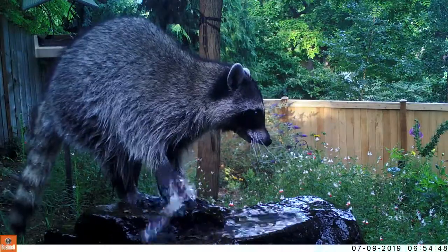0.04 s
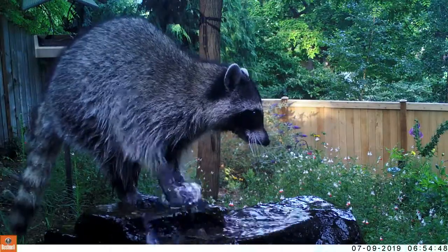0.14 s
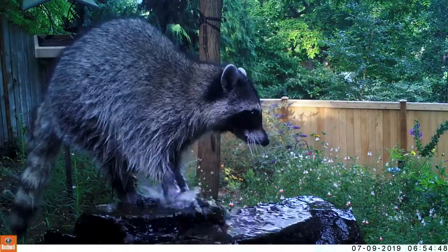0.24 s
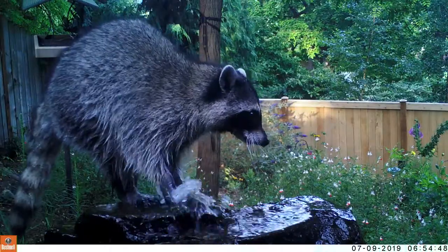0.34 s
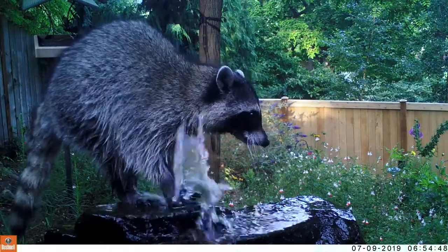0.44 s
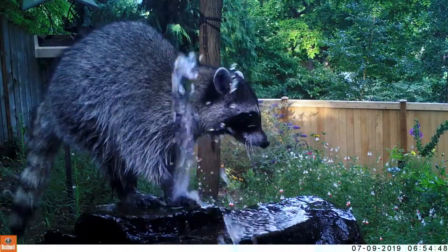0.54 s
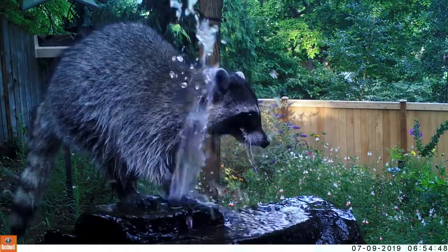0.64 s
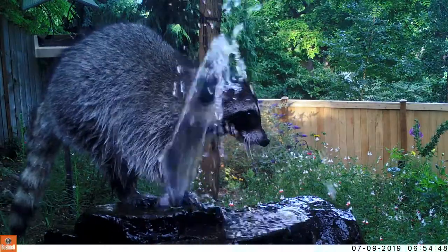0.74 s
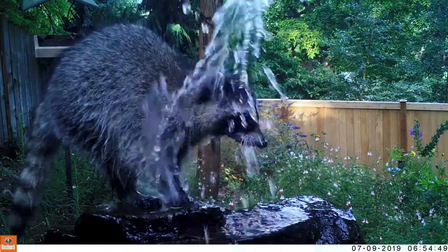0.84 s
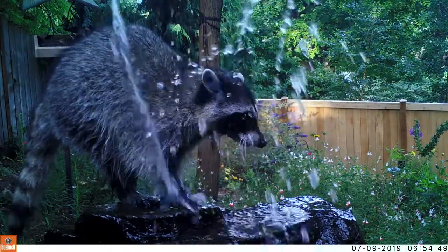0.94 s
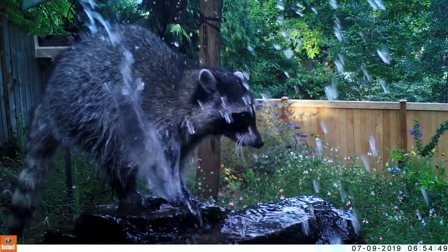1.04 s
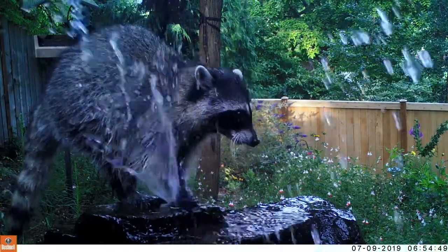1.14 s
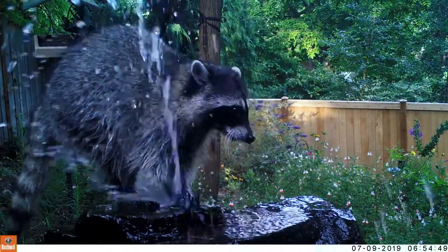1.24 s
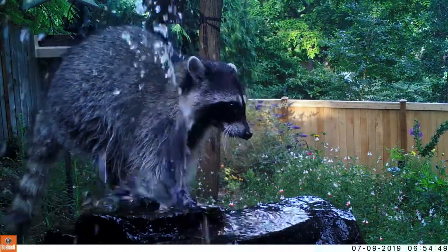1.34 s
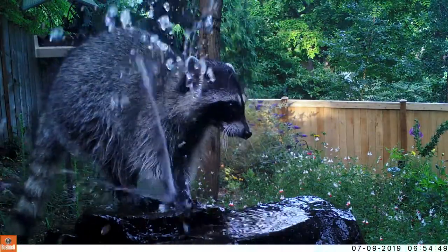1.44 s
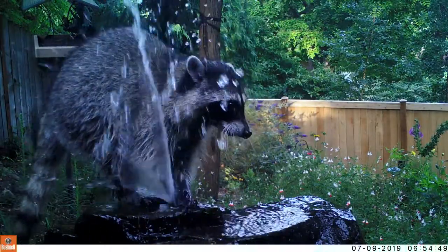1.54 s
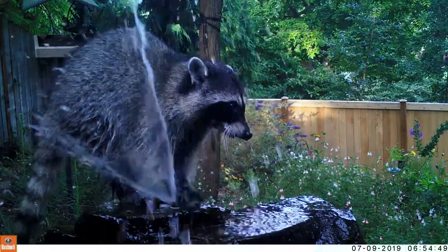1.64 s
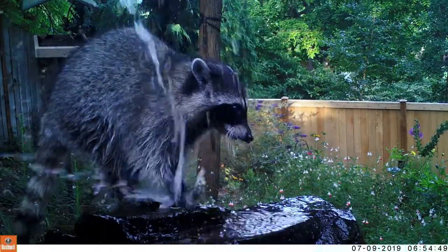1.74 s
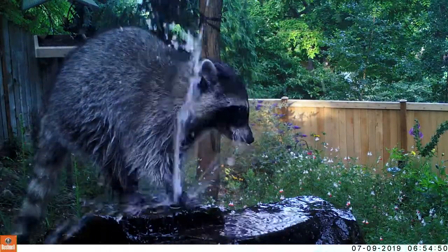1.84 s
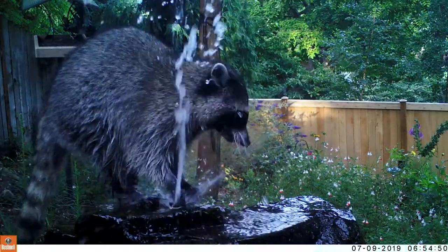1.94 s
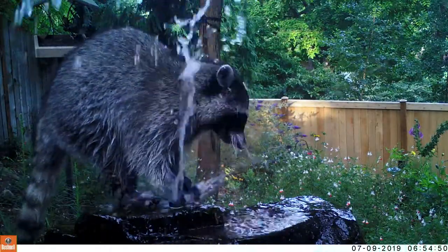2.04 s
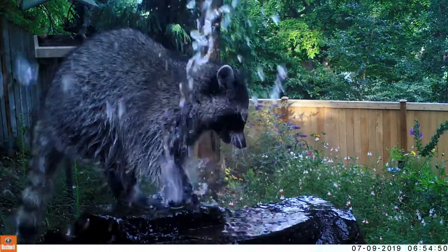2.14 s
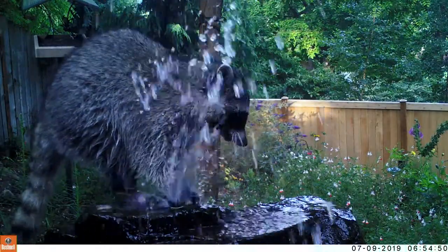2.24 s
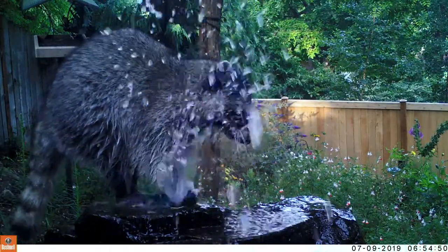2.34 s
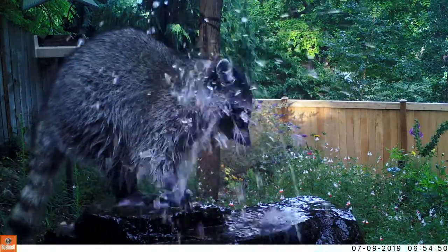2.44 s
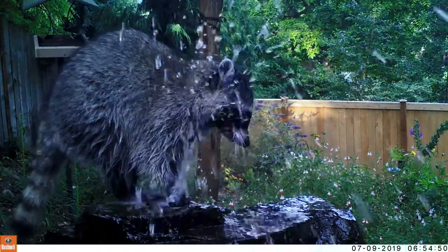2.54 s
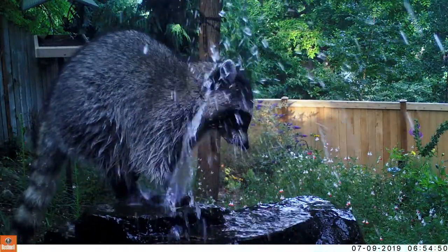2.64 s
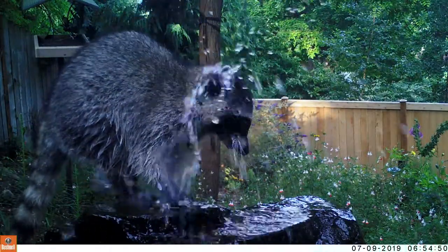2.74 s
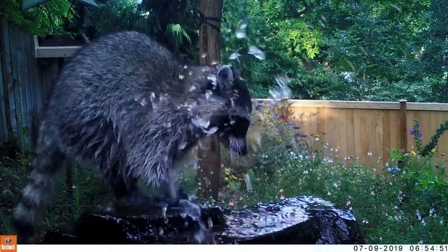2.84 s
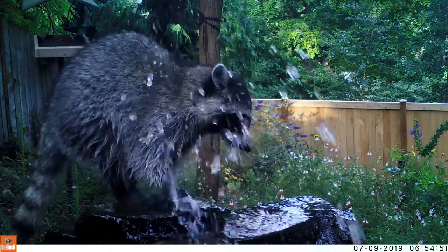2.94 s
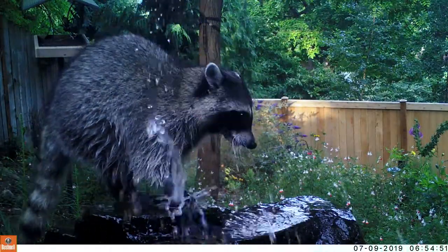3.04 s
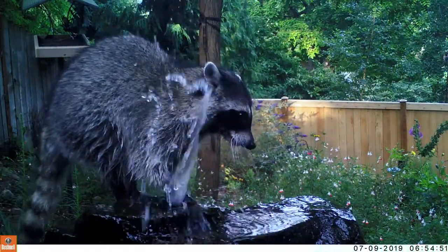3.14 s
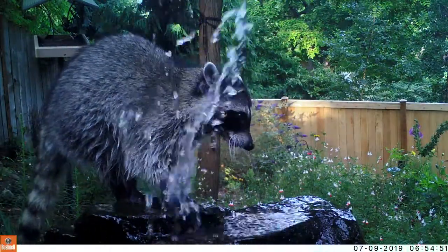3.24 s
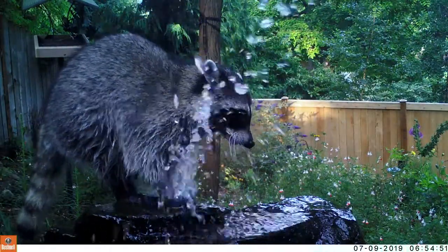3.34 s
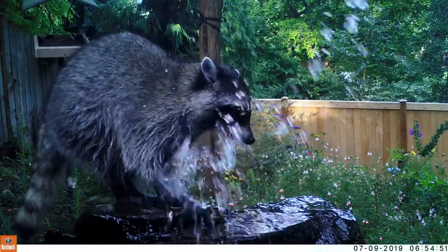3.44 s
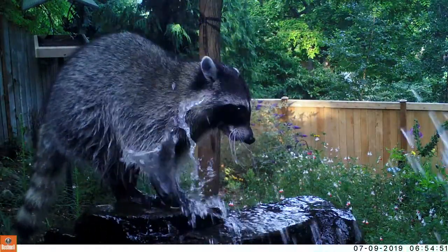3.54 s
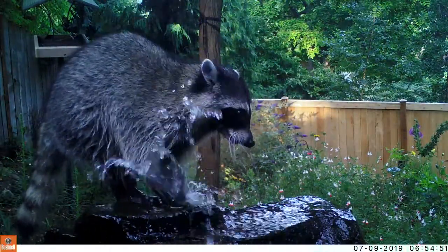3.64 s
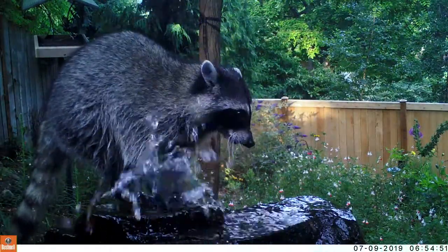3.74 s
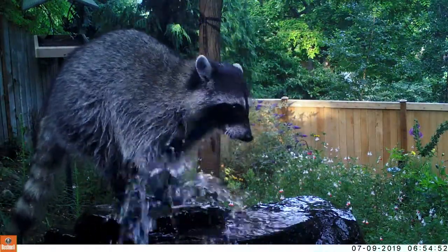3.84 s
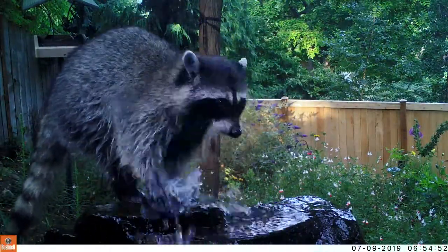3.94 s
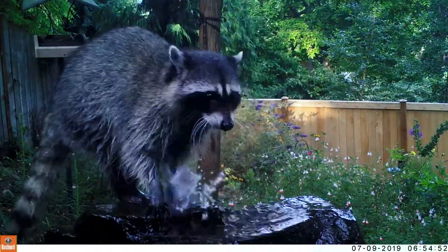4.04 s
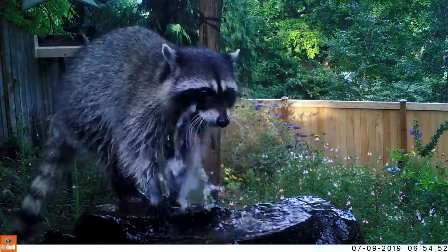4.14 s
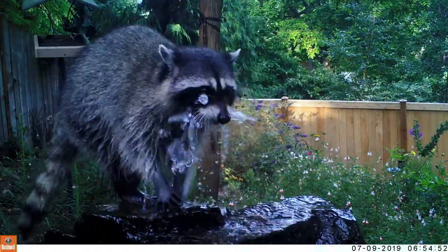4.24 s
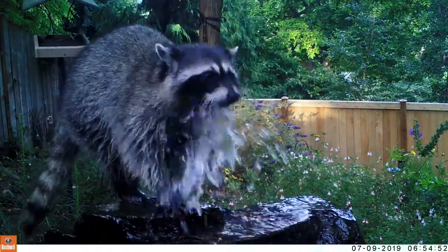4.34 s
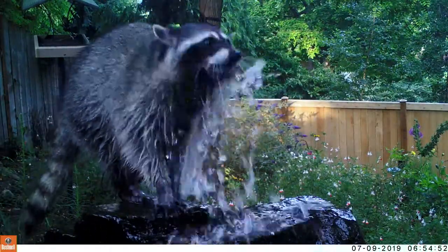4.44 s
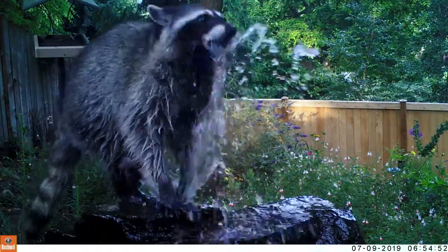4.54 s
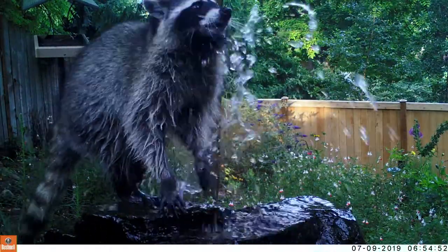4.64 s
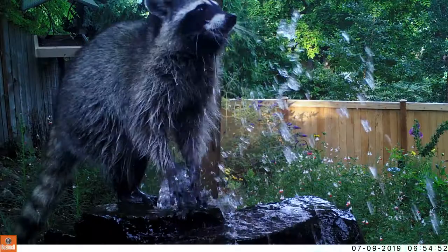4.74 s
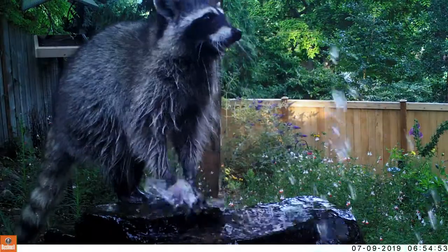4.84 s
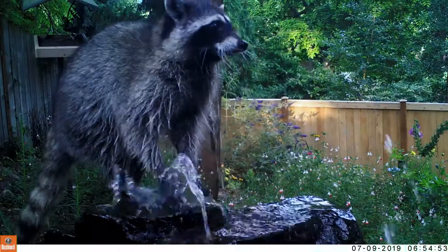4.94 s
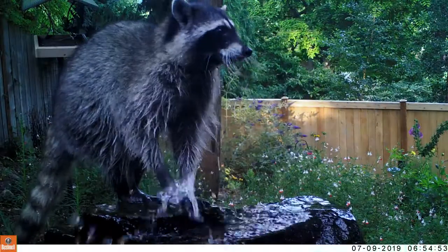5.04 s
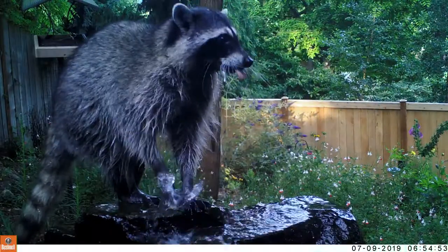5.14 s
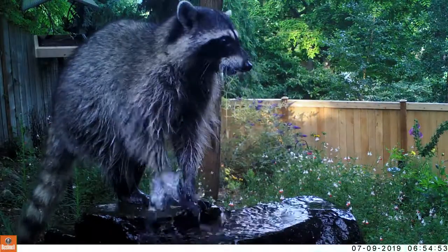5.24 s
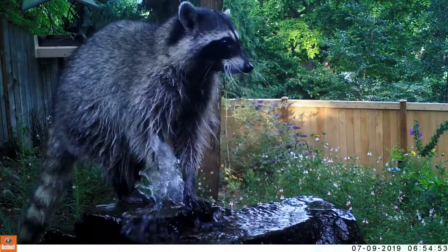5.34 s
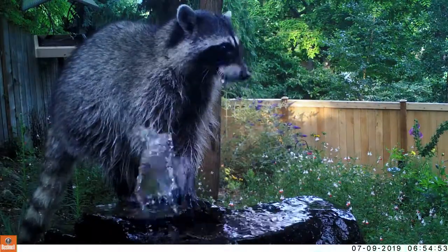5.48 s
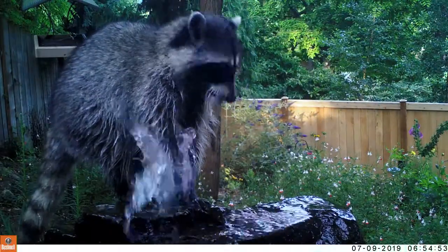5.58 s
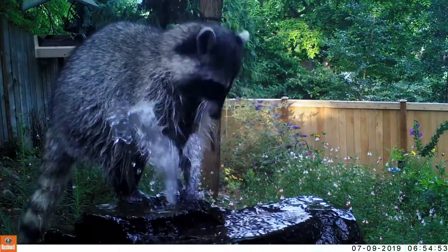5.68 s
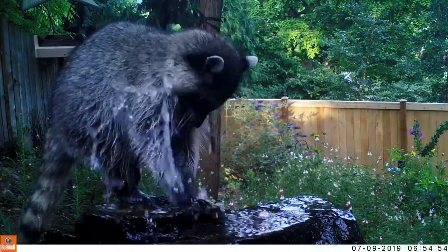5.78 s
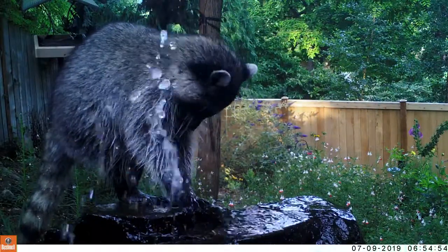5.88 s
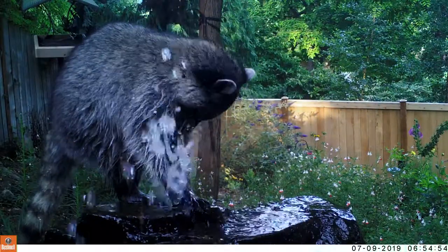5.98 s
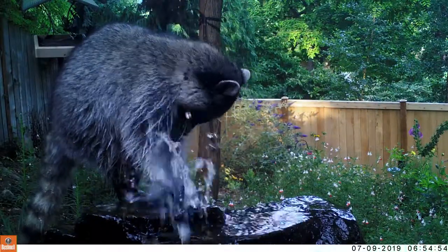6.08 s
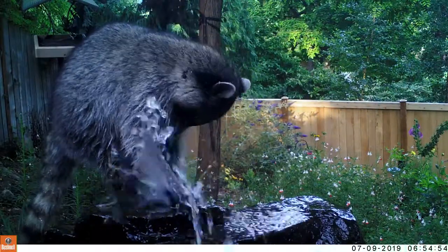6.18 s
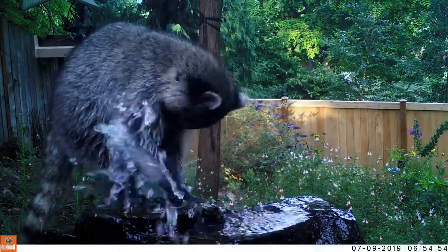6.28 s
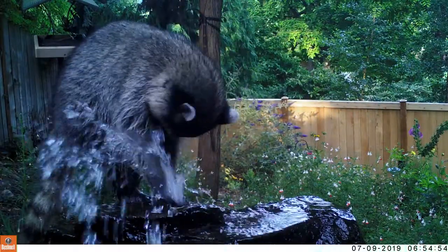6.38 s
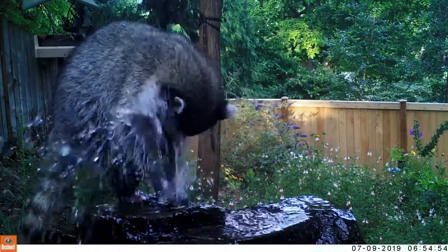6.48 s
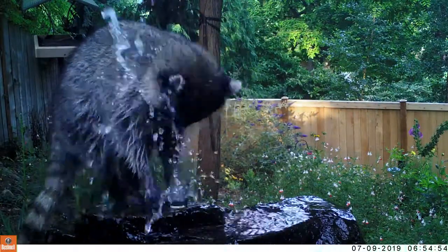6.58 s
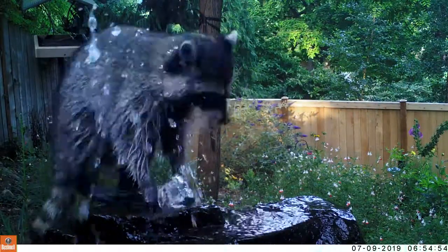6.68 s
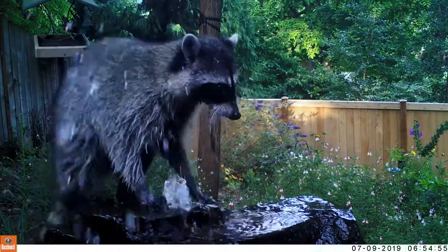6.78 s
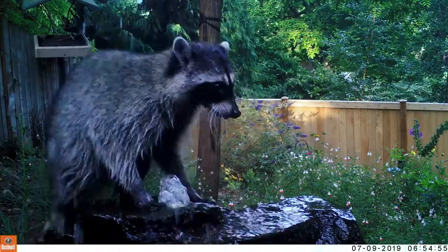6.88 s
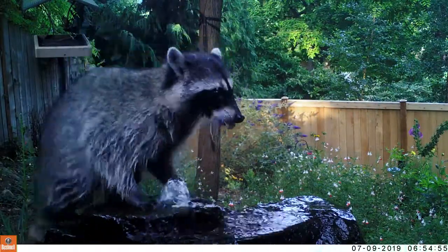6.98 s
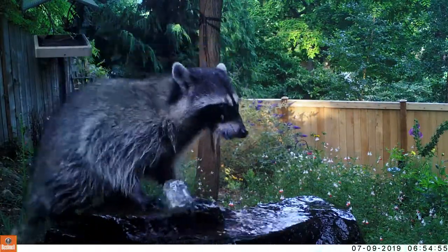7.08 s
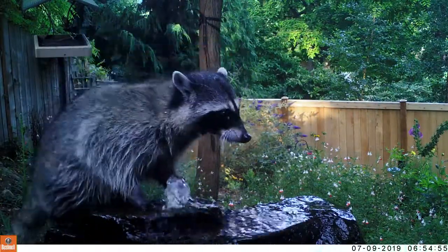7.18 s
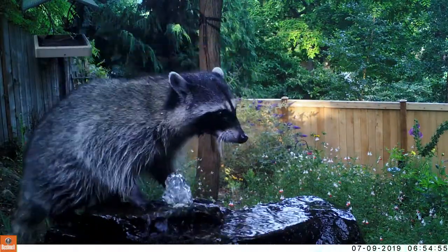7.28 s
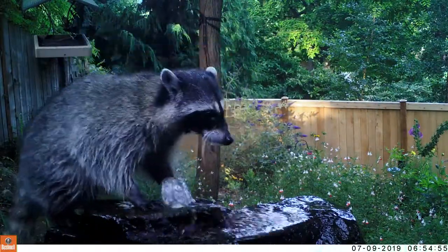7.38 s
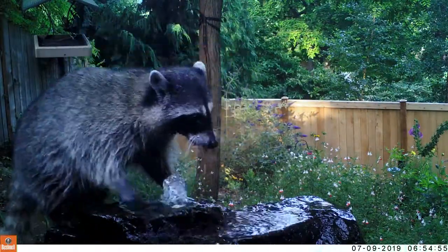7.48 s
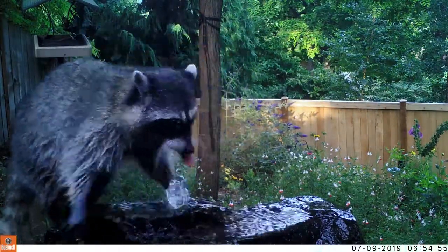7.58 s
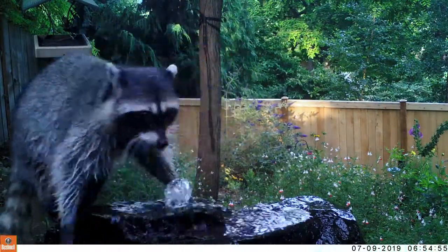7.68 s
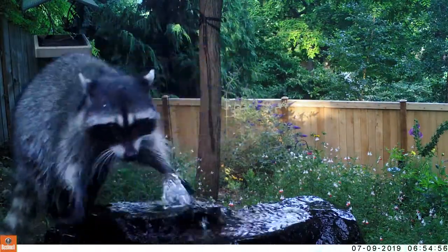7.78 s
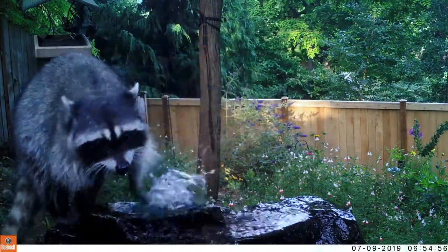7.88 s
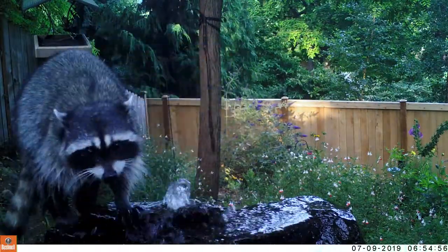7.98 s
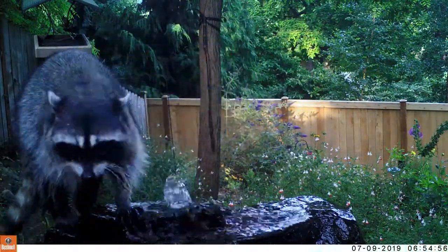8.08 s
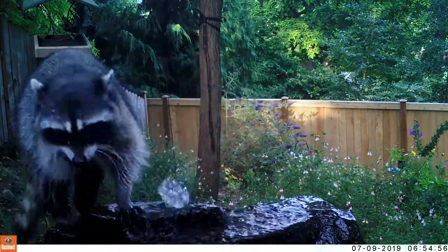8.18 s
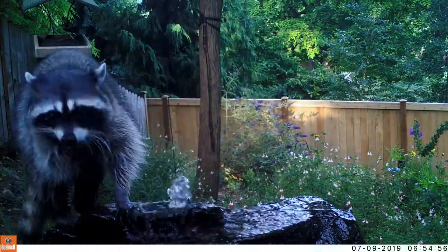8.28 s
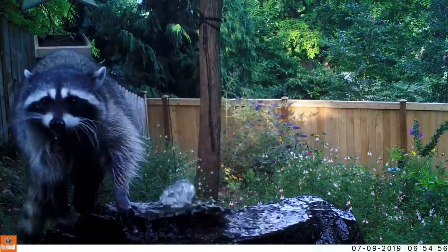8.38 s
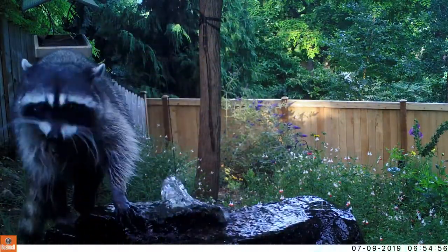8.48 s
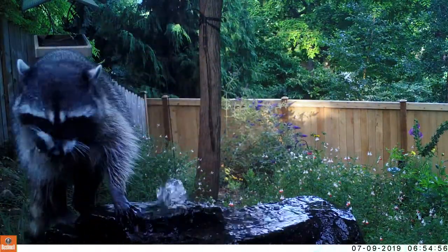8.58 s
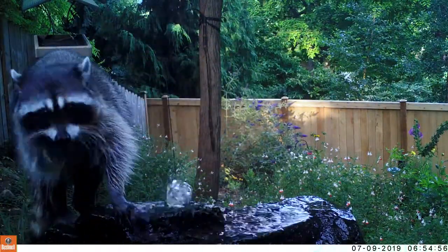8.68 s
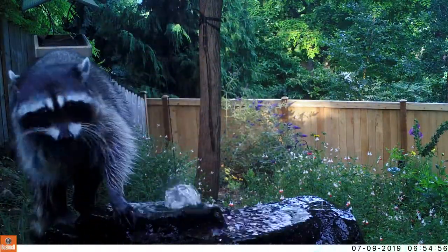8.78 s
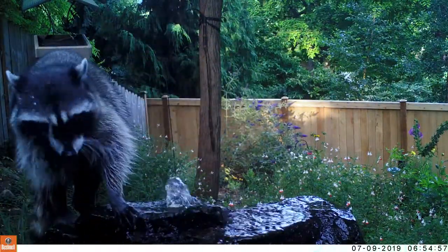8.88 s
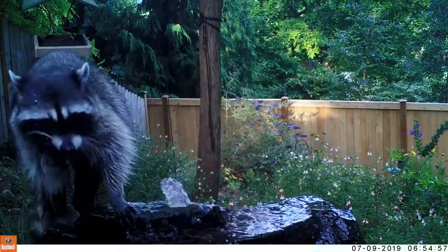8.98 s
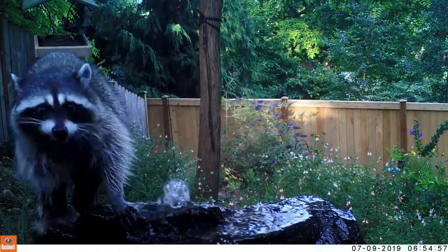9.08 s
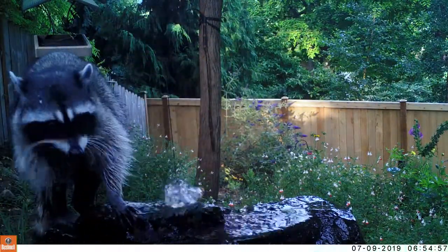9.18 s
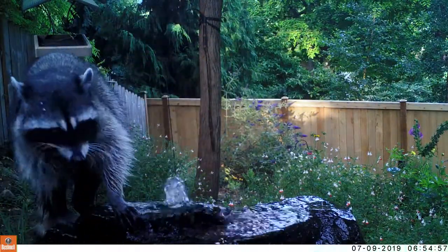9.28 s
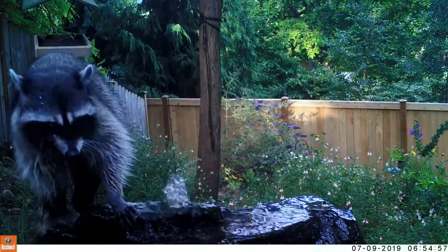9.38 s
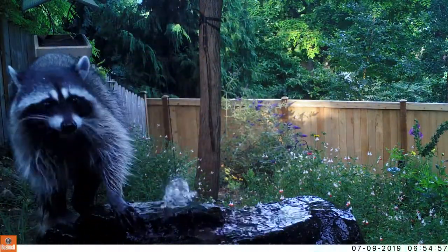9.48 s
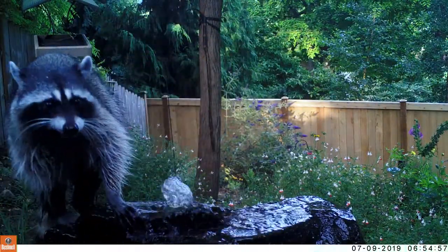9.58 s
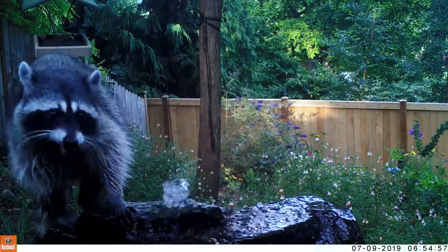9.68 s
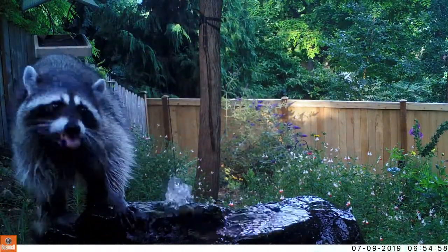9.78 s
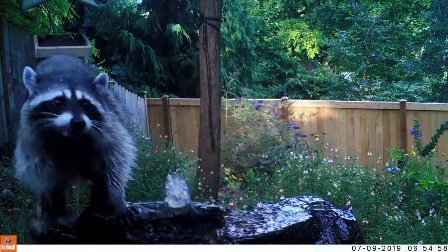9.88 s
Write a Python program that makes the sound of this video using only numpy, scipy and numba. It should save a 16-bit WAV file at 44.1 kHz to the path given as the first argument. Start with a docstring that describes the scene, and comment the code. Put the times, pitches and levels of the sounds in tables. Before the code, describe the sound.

A small rock fountain burbles close by throughout, over a faint low rumble of distant traffic. From the start a raccoon paws at the jet, and thrown water patters brightly on stone and leaves, with wet splats, small rising bubble pops and occasional soft plops. From about 1 second the spray thickens into a busy shower, and a paw gives a few light, hollow slaps on wet rock up to 2.5 seconds and once more near 5. Around 3 seconds fine drops begin ticking on the stone. Splashes then come in uneven surges, near 3.3, 3.9, 4.5, 5 and 5.8 seconds, with brief lulls between them. A strong splash lands at about 6.4 seconds, followed by more spatter around 7. After that the spray thins to scattered drops and a few small splats, while the jet keeps burbling quietly until the end, near 10 seconds.

```python
"""A raccoon paws at the jet of a garden rock fountain. From the start the jet burbles over far traffic,
thrown water patters on stone and leaves, air pockets pop with a rising chirp and big bubbles ring softly.
Gobs land as splats; from about one second the spray thickens and a paw now and then slaps the wet rock.
Near three seconds fine drops begin to tick on stone. Showers come and go, and after seven seconds
the spray thins to scattered drops while the jet burbles on."""
import sys
import numpy as np
from scipy import signal
from scipy.fft import rfft, irfft
from scipy.io import wavfile
from scipy.ndimage import uniform_filter1d
from numba import njit

SR = 44100
rng = np.random.default_rng(int(sys.argv[2]) if len(sys.argv) > 2 else 0)


def bounce(signal):
    """Save signal as a 16-bit WAV file at the path given by the first command-line argument."""
    frames = np.transpose(np.atleast_2d(signal))
    limited = np.clip(frames, -1, 1)
    pcm = np.round(limited * 32767).astype(np.int16)
    wavfile.write(sys.argv[1], SR, pcm)


N = 437472

# spectrum of the background noise: (frequency [Hz], relative level [dB])
YARD_SPECTRUM = [(9, -29.5), (15, 0.5), (33, 1.5), (87, -5), (250, -17), (490, -24.5), (730, -27),
                 (2100, -36.5), (6000, -43.5), (10000, -51.5), (14500, -48.5)]
# steady fall of thrown water: (time [s], level [dB], treble lift from fine spray [dB])
STEADY_FALL = [(0, -63, -2), (0.19, -69, 0), (0.3, -60.5, -2), (1.0, -54.5, 4.5), (1.4, -49.5, 4),
               (1.8, -49, 6.5), (2.3, -50.5, 5.5), (3.1, -52, 3.5), (3.2, -57, 2.5), (3.7, -60, 10),
               (4.25, -64.5, 4), (4.9, -62.5, 2), (5.6, -62, 3), (6.0, -51.5, -2), (6.35, -56.5, 5),
               (6.8, -54, 7), (7.3, -63, 7.5), (7.7, -70, -6), (8.2, -62.5, 5), (8.4, -67.5, -4),
               (9.92, -68.5, 4)]
# sheets of water flung by a paw: (peak time [s], level [dB], decay time [s])
FLUNG_SHEETS = [(0.27, -58, .06), (1.27, -54, 0.027), (1.38, -52.5, 0.19), (1.83, -41.5, 0.022),
                (2.41, -45.5, 0.51), (3.27, -45.5, 0.094), (3.5, -51, 0.037), (3.8, -47.5, 0.036),
                (3.89, -44.5, 0.052), (4.05, -51.5, 0.12), (4.32, -53.5, 0.16), (4.541, -49.5, 0.15),
                (4.62, -52, 0.063), (4.98, -46, 0.091), (5.06, -54, 0.046), (5.165, -48, 0.025),
                (5.275, -47, 0.043), (5.42, -57, 0.088), (5.809, -43, 0.029), (6.09, -51, 0.044),
                (6.393, -38, 0.052), (6.9, -49, 0.041), (7.15, -55, 0.047), (8.25, -58, 0.03),
                (9.39, -63.5, .06)]
# the microphone's colouring of the water, ringing near 3.3 and 5.9 kHz: (frequency [Hz], gain [dB])
MIC_COLOUR = [(410, -25), (700, -25.5), (1130, -12.5), (1580, -14), (1880, -13.5), (3290, -3), (4030, -3),
              (5890, 2.5), (9070, -13.5), (12300, -30), (14000, -32), (14500, -60)]
# air pockets closing: (time [s], peak level [dB], pitch at the peak [Hz], climb [octaves])
AIR_POCKETS = [(0.048, -46, 2500, 0.63), (0.314, -56, 760, 0.41), (0.571, -43.5, 1480, 0.4),
               (0.636, -39, 2030, 1.03), (1.137, -40.5, 2400, 1.3), (1.2558, -29.5, 2610, 2.6),
               (1.3747, -38, 1496, 0.2), (1.9322, -28, 3160, 1.24), (2.1877, -40, 3430, 1.5),
               (2.3918, -24, 3270, 0.71), (2.942, -44.5, 2350, 1.9), (3.2724, -30.5, 3370, 1.4),
               (4.6088, -35, 3000, 0.61), (5.132, -43, 3500, 1), (5.2664, -47, 3120, 1.3),
               (5.895, -43, 1470, 1), (6.005, -37, 2840, 0.37), (6.168, -39, 2790, 1.5),
               (6.3816, -32, 3220, 2.2), (6.575, -36, 3700, 1.4), (6.813, -38, 2300, 0.72),
               (6.9068, -33.5, 2900, 1.05), (6.9517, -36.5, 2640, 1.14), (7.524, -47, 3930, .3),
               (8.409, -49, 2960, 0.5), (8.928, -46.5, 4280, 0.74), (9.648, -52.5, 2600, .3)]
# big bubbles in the basin: (time [s], peak level [dB])
BASIN_BUBBLES = [(0.222, -60), (0.92, -62), (1.645, -57), (2.158, -57), (2.64, -63), (4.85, -62),
                 (6.585, -60), (7.955, -61)]
# gobs landing: (time [s], nominal level [dB], pitch [Hz], droplets relative to that level [dB])
GOBS = [(0.27, -26.5, 5730, -18.5), (0.334, -32, 5600, -11), (0.743, -35, 6050, -10.5),
        (0.782, -29.5, 6100, -10), (0.8131, -32, 5450, -12), (0.94, -30, 5130, -30),
        (1.0165, -27.5, 4700, -16), (1.076, -27.5, 5500, -11), (1.1446, -27.5, 6800, -15),
        (1.218, -20.5, 5400, -13.5), (1.27, -24, 5810, -9.5), (1.441, -27, 5600, -18),
        (1.3657, -28, 5060, -10), (1.4054, -18, 6100, -30), (1.46, -24.5, 4670, -8),
        (1.6127, -28.5, 5230, -31), (1.8445, -28, 5360, -8), (1.8903, -18, 5300, -27),
        (1.933, -24, 4730, -14.5), (2.0018, -25.5, 5800, -4), (2.1281, -17, 6300, -36),
        (2.1885, -31.5, 3580, -14.5), (2.363, -27, 5050, -13.5), (2.3934, -24.5, 3070, -14.5),
        (2.465, -31, 5280, 0), (2.567, -25, 6030, -9.5), (2.7385, -23, 5970, -23),
        (2.783, -23.5, 4730, -30), (2.8427, -19.5, 6600, -28), (2.9238, -20, 7060, -23.5),
        (3.127, -27, 6940, -17.5), (3.244, -19, 5240, -20), (3.272, -17.5, 3600, -30),
        (3.3278, -26.5, 5800, -13), (3.3889, -29, 6800, -21), (3.475, -24.5, 6350, -26),
        (3.5214, -26.5, 6040, -15), (3.6714, -28.5, 7350, -33), (3.6934, -26, 7260, -22),
        (3.787, -23, 6160, -14.5), (3.8692, -22, 5490, -13), (3.9147, -21.5, 6700, -19),
        (3.9955, -27.5, 5550, -16.5), (4.077, -27.5, 5740, -24), (4.134, -29.5, 3900, -18.5),
        (4.3179, -22, 6060, -29), (4.6091, -31.5, 5450, -6.5), (4.678, -31, 5500, -10.5),
        (4.735, -29, 5600, -24), (4.783, -30.5, 6740, -16), (4.999, -32.5, 4440, -13),
        (5.017, -27, 5000, -12.5), (5.0496, -16.5, 5200, -21.5), (5.134, -29.5, 4480, -10.5),
        (5.281, -36, 5850, -7), (5.379, -34, 6240, -19), (5.417, -27, 6200, -18.5), (5.642, -28, 6000, -21),
        (6.2547, -27.5, 5130, -17.5), (6.375, -21, 5700, -26), (6.3828, -25, 6270, -20),
        (6.427, -30, 6000, -10), (6.471, -19, 6360, -15.5), (6.6473, -30, 6370, -9),
        (6.7275, -28, 3800, -25), (6.769, -24.5, 6580, -17), (6.7976, -26, 6600, -15.5),
        (6.905, -40, 5530, -7), (6.9972, -21.5, 5440, -20.5), (7.094, -41.5, 7400, -12.5),
        (7.1559, -28, 5780, -5.5), (7.222, -26.5, 8500, -30), (7.255, -43, 6500, -5),
        (7.9935, -40.5, 5960, -8.5), (8.0407, -35, 5930, -12), (8.237, -43, 3140, -9),
        (9.1355, -35.5, 4770, -25), (9.351, -38, 3650, -24), (9.3784, -41.5, 5840, -4),
        (9.874, -33, 5060, -26)]
# paws striking wet rock: (time [s], peak level [dB])
PAW_BLOWS = [(1.254, -44), (1.459, -35), (1.999, -36), (2.464, -40), (5.132, -46)]
# fine drops bursting on stone: (time [s], nominal level [dB])
FINE_DROPS = [(2.9103, -41), (2.9288, -30), (2.9941, -42), (3.0288, -33.5), (3.0955, -29.5), (3.142, -33.5),
              (3.3378, -39), (3.374, -39), (3.396, -35), (3.4282, -36), (3.494, -39), (3.6857, -33),
              (3.9504, -37), (4.0644, -39), (5.3348, -46.5), (5.9569, -48), (6.0888, -34), (6.2766, -46),
              (6.6804, -50), (6.7112, -29.5), (6.7502, -31.5), (7.1112, -41), (7.1284, -36), (8.317, -51),
              (8.3623, -43.5), (8.4855, -52), (9.0344, -50), (9.4015, -50), (9.5173, -51)]


def undb(db):
    return 10 ** (np.asarray(db) / 20)


def level(x, db):
    return x * undb(db) / np.sqrt(np.mean(x ** 2))


def outline(points, hz):
    """Interpolation of a spectrum in dB over log frequency."""
    corner_hz, db = np.transpose(points)
    return np.interp(np.log(hz), np.log(corner_hz), db)


def colour(x, points):
    """Minimum-phase filtering: folding the cepstrum makes the given spectrum a causal response."""
    cepstrum = irfft(np.log(undb(outline(points, np.arange(1, 4098) * SR / 8192))))
    cepstrum[1:4096] *= 2
    cepstrum[4097:] = 0
    return signal.fftconvolve(x, irfft(np.exp(rfft(cepstrum))))[:N]


def wander(rate_hz):
    """Random modulation: held values, smoothed twice, of unit deviation."""
    hold = int(SR / rate_hz)
    steps = np.repeat(rng.standard_normal(N // hold + 1), hold)
    smooth = uniform_filter1d(uniform_filter1d(steps, hold), hold)[:N]
    return smooth / np.std(smooth)


@njit
def ring(times, hz, cycles, octaves, peak, sharpness):
    """Damped oscillators: each peaks at hz after cycles / 3 periods and climbs `octaves` in twice that."""
    out = np.zeros(N)
    for g in range(len(times)):
        rise = cycles[g] / hz[g] * SR / 3
        start, phase = int(times[g] * SR), 0.
        for i in range(min(int(8 * rise), N - start)):
            age = i / rise
            pitch = hz[g] * 2 ** (octaves[g] * (min(age, 2.2) - 1) / 2)
            phase += min(pitch / SR, .45)
            envelope = (age * np.exp(1 - age)) ** sharpness
            out[start + i] += peak[g] * envelope * np.sin(2 * np.pi * phase)
    return out


def droplets(times, hz, peak_db, cycles, octaves, length_scatter, climb_scatter):
    """Impact excitation: each droplet rings briefly, with its own length and climb."""
    cycles = cycles * np.exp(.5 * np.clip(length_scatter, -2, 2))
    octaves = octaves * (1 + .79 * climb_scatter)
    grains = np.broadcast_arrays(times, hz, cycles, octaves, undb(peak_db))
    return ring(*[column.flatten() for column in grains], sharpness=.89)


def yard():
    """Broadband noise: far traffic rumbles below, the microphone's self-noise hisses above."""
    return level(colour(rng.standard_normal(N), YARD_SPECTRUM), db=-52)


def burble():
    """Bubble resonance: the jet falls back on its rock in fits of low bubbles and brighter drips."""
    position, height, size, length = rng.random((1800, 4)).T
    times = position * N / SR
    hz = 750 * 2 ** (3 * height ** .9)
    fits_db = 3.1 * wander(14)[(times * SR).astype(int)]
    peak_db = -72 + 2 * height - (2.5 + 3.5 * height ** 2) * np.log(size + .028) + fits_db
    return ring(times, hz, 5 + 11 * length ** 2, .3 * length * height, undb(peak_db), sharpness=1.)


def flow_db(t, rise_s=.023):
    """Incoherent sources add in power: the steady fall plus sheets of water that swell and fade."""
    times, steady_db, _ = np.transpose(STEADY_FALL)
    power = undb(np.interp(t, times, steady_db)) ** 2
    for peak_s, peak_db, decay_s in FLUNG_SHEETS:
        envelope = np.exp(-np.where(t < peak_s, (peak_s - t) / rise_s, (t - peak_s) / decay_s))
        power += (undb(peak_db) * envelope) ** 2
    return 10 * np.log10(power)


def mist_db(t):
    """Smaller drops radiate higher frequencies: the treble lift of fine spray at time t."""
    times, _, lift_db = np.transpose(STEADY_FALL)
    return np.interp(t, times, lift_db)


def spray(count=18000):
    """Superposition of random impacts: clumps of droplets patter over a smoother hiss."""
    t = np.arange(N) / SR
    position, height, size = rng.random((count, 3)).T
    times, hz = position * N / SR, 1500 + 12200 * height
    # coarse, middling and fine drops clump partly together; the finest come and go most
    shared = wander(70)
    clump_db = np.array([depth_db * np.tanh(.8 * shared + .3 * wander(40)) for depth_db in (7, 7, 9.5)])
    grade = np.searchsorted([4200, 7500], hz)
    # small drops ring high and short, so equal energy needs more amplitude
    peak_db = 10 * np.log10(hz) - 2.97 * np.log(size + .0047)
    peak_db += clump_db[grade, (times * SR).astype(int)]
    patter = droplets(times, hz, peak_db, 2.5 + hz / 3000, .12, *rng.standard_normal((count, 2)).T)
    hiss = undb(.45 * clump_db[1]) * rng.standard_normal(N)
    water = colour(level(patter, 0) + level(hiss, -2.7), MIC_COLOUR)
    treble = signal.sosfilt(signal.butter(2, 7500, "high", fs=SR, output="sos"), water)
    return undb(flow_db(t)) * (water + (undb(mist_db(t)) - 1) * treble) / np.std(water)


def pops():
    """Resonance rises as a cavity shrinks: each air pocket chirps upward for a few cycles."""
    times, peak_db, hz, octaves = np.transpose(AIR_POCKETS)
    return ring(times, hz, np.full(len(times), 9.), octaves, undb(peak_db), sharpness=1.35)


def glugs(hz=1204, cycles=17, octaves=.05):
    """Radius sets a bubble's resonance: big bubbles of like size ring on one nearly steady note."""
    times, peak_db = np.transpose(BASIN_BUBBLES)
    alike = np.ones(len(times))
    return ring(times, hz * alike, cycles * alike, octaves * alike, undb(peak_db), sharpness=1.)


def small_gobs(count=80):
    """Random arrivals: rows as in GOBS for lesser gobs, louder where the spray is heavy."""
    times = rng.random(count) * (N / SR - .1)
    size, tone = rng.standard_normal((count, 2)).T
    gob_db = flow_db(times) + 13 + 3 * size
    return np.transpose([times, gob_db, 6400 * np.exp(.18 * tone), np.full(count, -10.5)])


def splats(strike_below_db=4):
    """Impact and break-up: a gob, led by a few droplets, strikes with a tick and shatters."""
    times, gob_db, hz, shatter_db = np.vstack([GOBS, small_gobs()]).T[:, :, None]
    timing, tone, size, length = np.moveaxis(rng.standard_normal((len(times), 30, 4)), 2, 0)
    fragment = np.arange(30) > 0  # grain 0 is the strike itself
    gap = np.abs(timing) * fragment
    onsets = times + np.where(timing < -.8, -.0015, .006) * gap
    pitch = np.clip(hz * np.exp(.455 * tone * fragment), 900, 13000)
    # the strike sounds a few dB below the gob's nominal level
    strike_db = gob_db - strike_below_db - outline(MIC_COLOUR, hz)
    fragment_db = shatter_db + strike_below_db - 4 * gap + 3 * np.clip(size, -2, 2)
    fragment_db += (1.6 + mist_db(times)) * (pitch > 7500)
    burst = droplets(onsets, pitch, strike_db + fragment_db * fragment, 4.16, .14, length * fragment, size)
    # first contact rings an octave higher, crisper when the spray is fine
    tick_db = strike_db - 6 + .66 * mist_db(times) + 1.6 * length[:, :1]
    tick = droplets(times, 2 * hz, tick_db, cycles=4.2, octaves=0., length_scatter=0, climb_scatter=0)
    return colour(burst + tick, MIC_COLOUR)


def slaps(front_s=.0056, tail_s=.018):
    """Damped impact: a paw on wet rock gives a hollow noise burst with a quick front and a slower tail."""
    out, t = np.zeros(N), np.arange(3000) / SR
    band = signal.butter(3, (480, 2400), "band", fs=SR, output="sos")
    envelope = np.exp(-t / front_s) + .99 * np.exp(-t / tail_s)
    for start_s, peak_db in PAW_BLOWS:
        blow = signal.sosfilt(band, rng.standard_normal(len(t)) * envelope)
        out[int(start_s * SR):][:len(t)] += undb(peak_db) * blow / np.abs(blow).max()
    return out


def ticks():
    """Fragmentation: a fine drop bursts into six droplets within a millisecond or two, a bright snap."""
    times, drop_db = np.array(FINE_DROPS).T[:, :, None]
    timing, tone, length, climb = np.moveaxis(rng.standard_normal((len(times), 6, 4)), 2, 0)
    hz = np.clip(7800 * np.exp(.26 * tone), 4000, 10500)
    return droplets(times + .0008 * np.abs(timing), hz, drop_db - 4, 4.5, .1, length, climb)


def reflections(x, decay_s=.011, echo_db=-10.5):
    """Scattering: nearby rocks, fence and leaves add a short diffuse tail to the direct sound."""
    t = np.arange(4000) / SR
    scatter = rng.standard_normal(len(t)) * np.exp(-t / decay_s) * (t > .001)
    return x + undb(echo_db) * signal.fftconvolve(x, scatter / np.linalg.norm(scatter))[:N]


def scene():
    """Linear superposition: the water, its reflections and the background sum in one channel."""
    water = spray() + splats() + ticks() + pops() + glugs() + slaps() + burble()
    return (reflections(water) + yard())[None]


def record(dry):
    """Band limiting: an elliptic low-pass cuts steeply above 13950 Hz."""
    return signal.sosfilt(signal.ellip(10, .2, 80, 13950, fs=SR, output="sos"), dry)


dry = scene()
out = record(dry)
bounce(out)
```